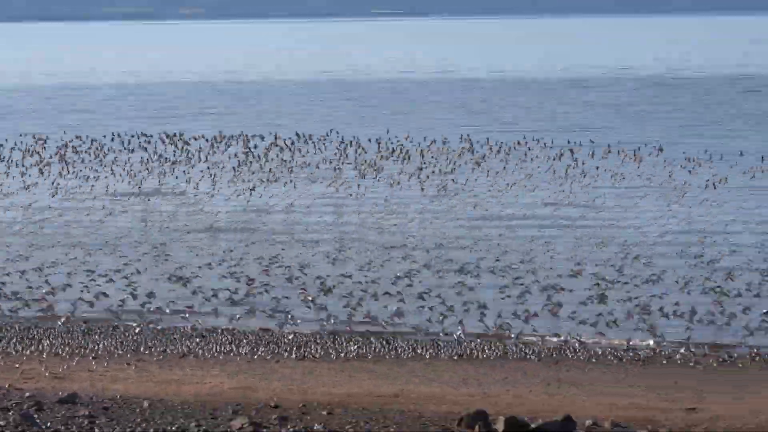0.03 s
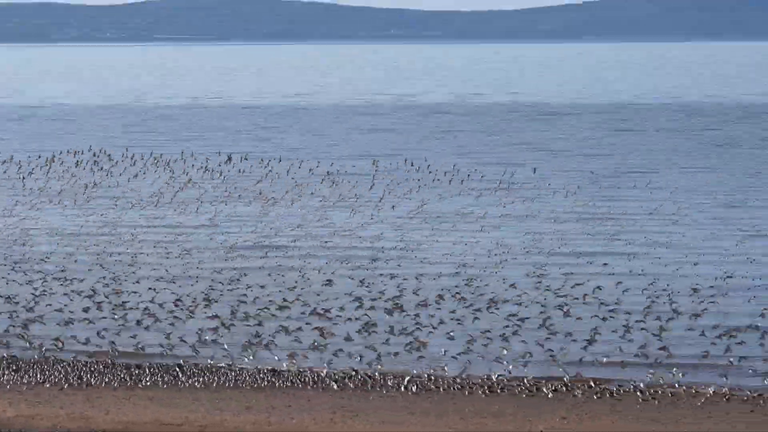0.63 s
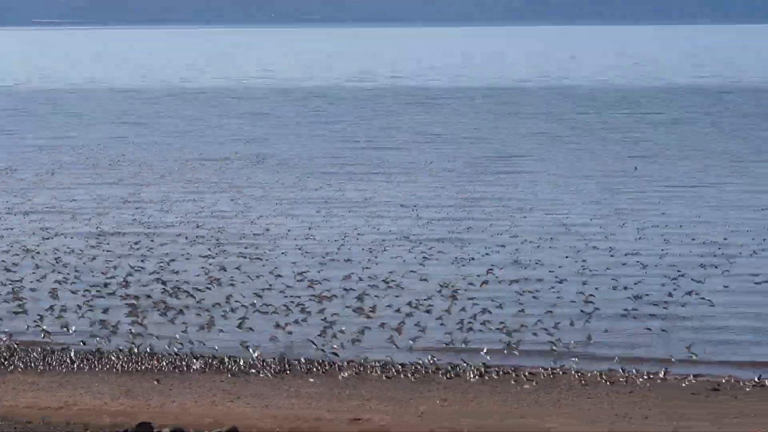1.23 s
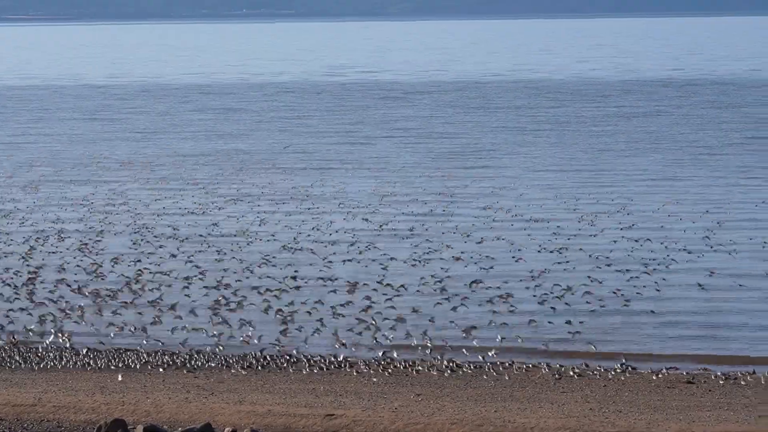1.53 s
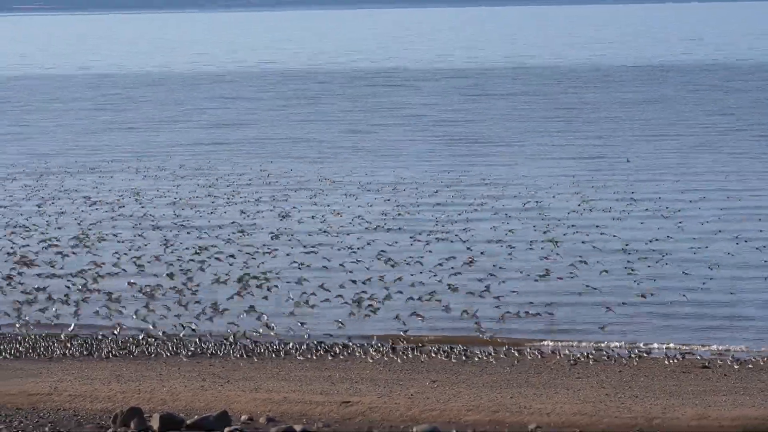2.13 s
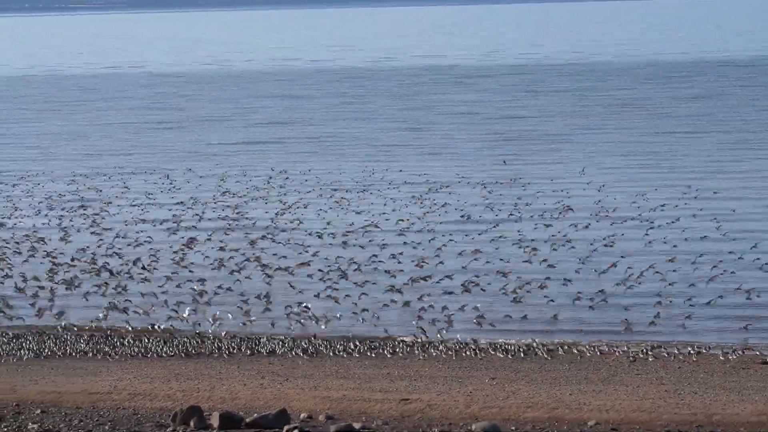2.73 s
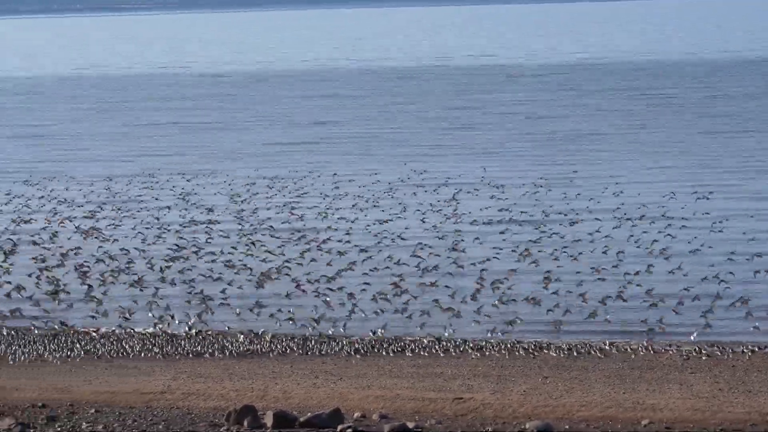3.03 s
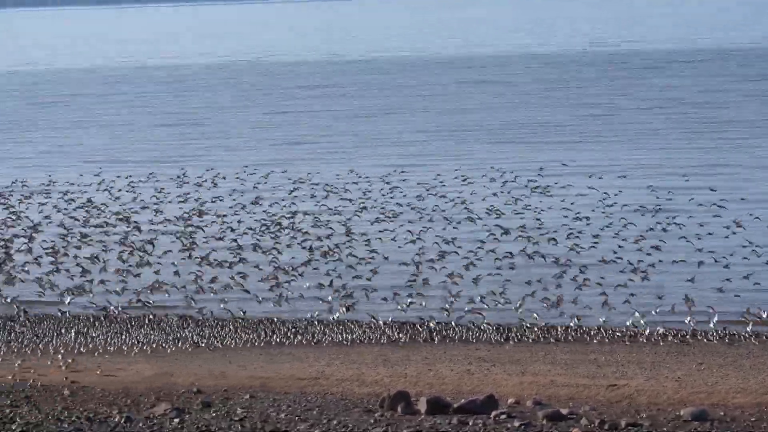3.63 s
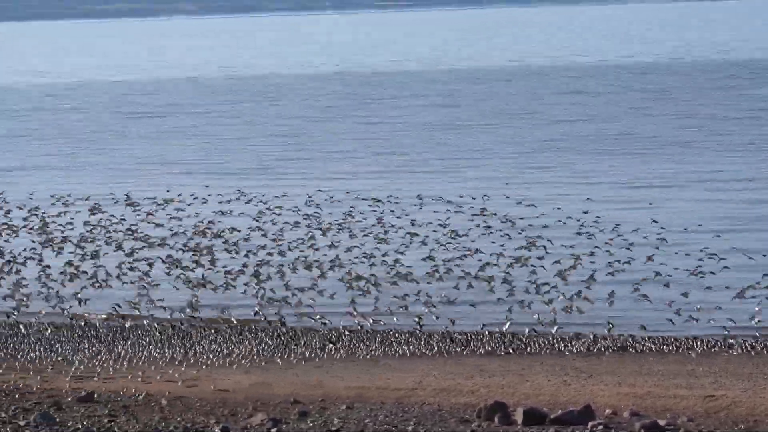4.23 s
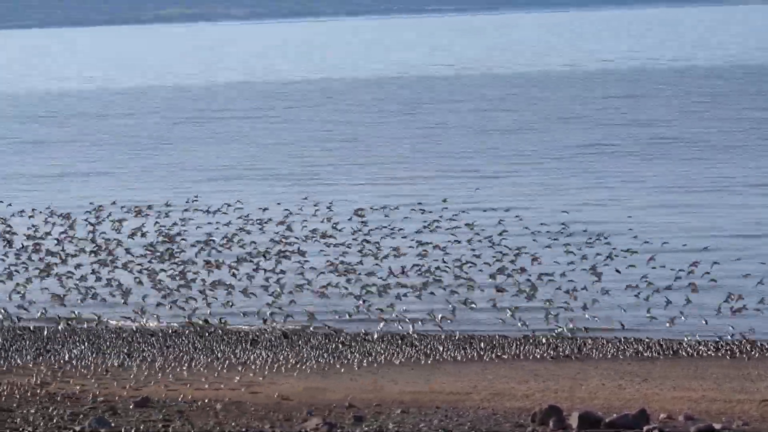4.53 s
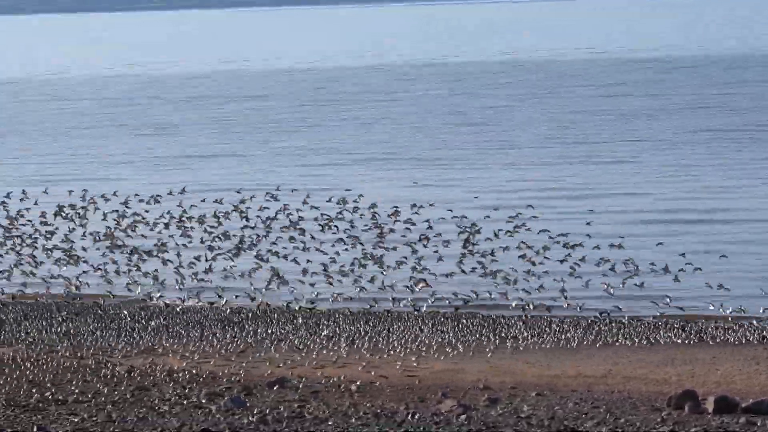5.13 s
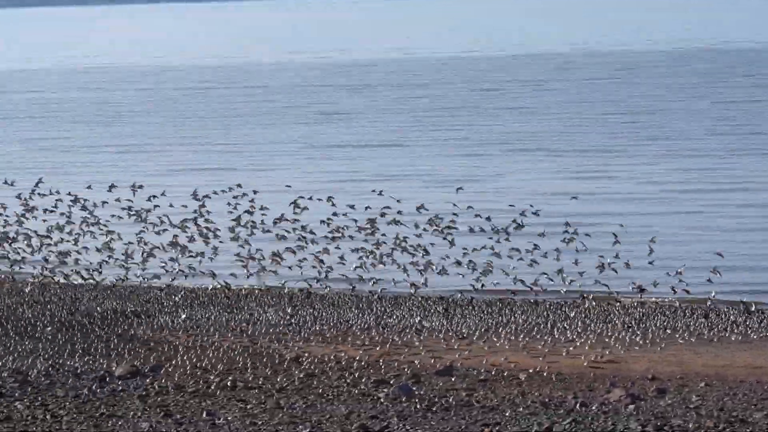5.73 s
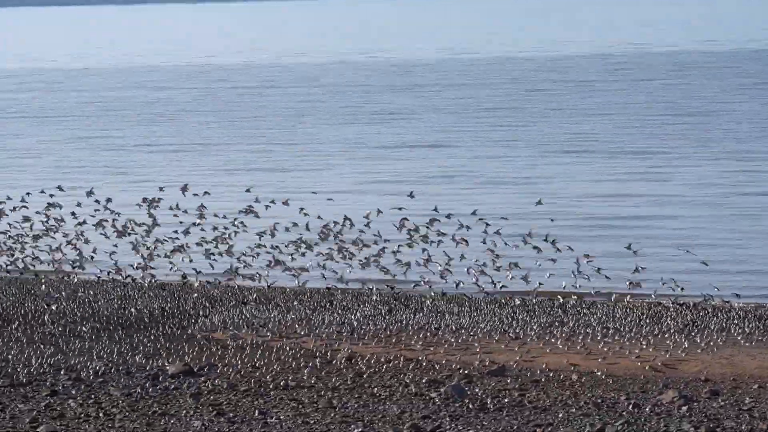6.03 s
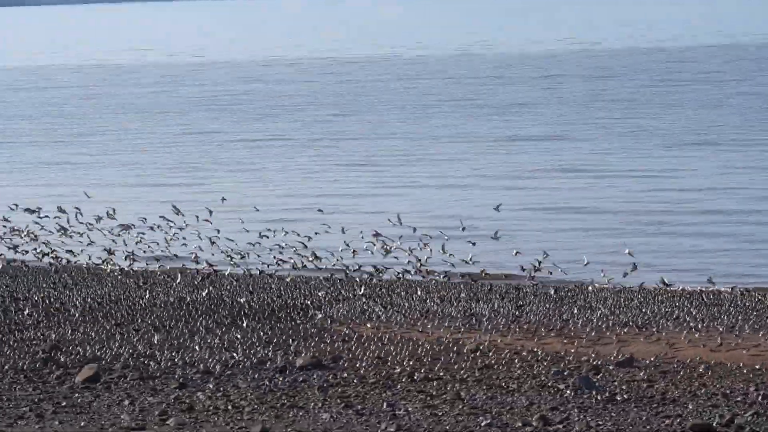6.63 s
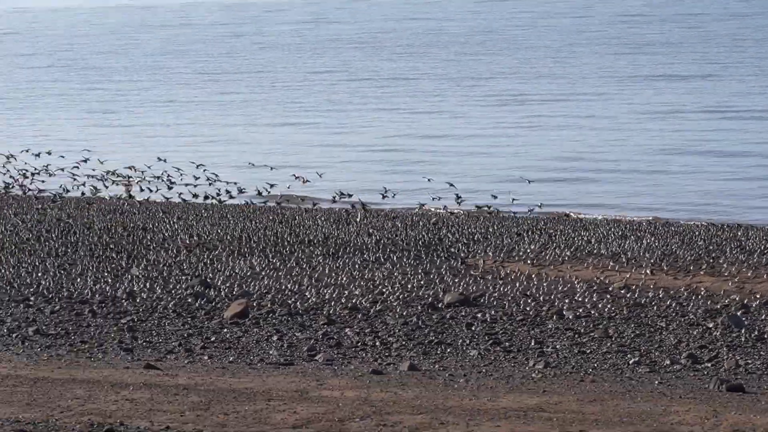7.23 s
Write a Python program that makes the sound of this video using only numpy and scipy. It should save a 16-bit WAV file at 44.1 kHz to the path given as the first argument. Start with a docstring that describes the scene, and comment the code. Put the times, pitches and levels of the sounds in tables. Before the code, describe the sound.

For about seven seconds, a large flock of small shorebirds makes a steady, wide hiss of blended twittering and rustling wings, with a faint wash of sea beneath. Close and louder, wind rumbles and thumps unevenly on the microphone throughout. A sharp, dry tick sounds nearby at 1.6 seconds. Small waves gurgle and foam softly around 2.7 and 5 seconds. Nearer birds add tiny high peeps, mostly between 2.5 and 5.7 seconds. At about 3.9 seconds one bird gives a clear, pure whistle that dips and then climbs. A faint, shorter whistle follows at 5.8 seconds, and another clear rising one at 6.2. The wind strikes hardest from 6 to 6.3 seconds and stays gusty to the end, while the flock eases slightly. A short, duller tap sounds close by at about 7.1 seconds.

```python
"""A hiss of thousands of sandpipers streams along a shore while wind buffets the microphone.
The hiss is their calls and wingbeats blending together. Small waves wash up the beach in bubbles
and foam, nearer birds peep, and something hard ticks close by. Later a few rising whistles,
like a plover's, stand out: each is one pure tone sliding in pitch."""
import sys
import numpy as np
from scipy import signal
from scipy.fft import rfft, irfft, next_fast_len
from scipy.io import wavfile
from scipy.ndimage import uniform_filter1d, map_coordinates

SR = 44100
rng = np.random.default_rng(int(sys.argv[2]) if len(sys.argv) > 2 else 0)


def store_pcm(level_fs):
    """Save levels as 16-bit WAV."""
    pcm = np.round(np.clip(level_fs, -1, 1) * 32767).astype(np.int16)
    wavfile.write(sys.argv[1], SR, np.atleast_2d(pcm).T)


N = 320607

# how loud the flock is: time_s, voices_db, wings_db
FLOCK_LEVELS = [(0, -46, -50), (1, -47, -48), (1.6, -45, -47.5), (3.1, -45.5, -47.3), (3.8, -43.5, -46.6),
                (4.65, -44.5, -46.5), (5.05, -44.5, -44.5), (5.8, -46, -44.5), (7.27, -49.5, -49)]
# tone of the massed voices and of the wings: frequency_hz, level_db
VOICES_TONE = [(1100, -52), (1900, -18), (2150, -5.5), (2500, 1.5), (2750, -2.9), (3000, 2.5), (3600, 1.1),
               (3900, -4), (4400, -8), (4650, -10), (4900, -16), (5700, -16.5), (9000, -34), (12000, -54)]
WINGS_TONE = [(200, -0.5), (400, -8.5), (750, -5.5), (1100, -1.5), (1250, -2.5), (1450, 2), (1700, 1.5),
              (1950, 0), (2250, 2), (2700, 3.5), (4000, -13.5), (7000, -25.5), (10000, -37)]
# strength of the breeze: time_s, level_db
BREEZE_LEVELS = [(0, -43), (.33, -35.5), (.7, -46), (1.1, -37.5), (1.6, -39.5), (1.8, -32.5), (2.15, -38.5),
                 (2.55, -37), (2.92, -41.5), (3.25, -36), (4.15, -42), (4.45, -52.5), (4.8, -41.5),
                 (5.33, -47.5), (5.56, -37.5), (5.85, -45.5), (6.1, -37), (7.27, -35)]
# sudden gusts: middle_s, half_length_s, level_db
GUSTS = [(.22, 0.0085, -29.5), (0.434, 0.014, -32), (0.807, 0.022, -33.5), (1.005, .03, -33.5),
         (1.555, 0.013, -33), (1.86, 0.033, -31.5), (2.42, 0.023, -29), (3.178, 0.023, -32),
         (3.382, 0.022, -30.5), (3.484, 0.0093, -29), (3.635, .015, -32.5), (3.74, 0.012, -30),
         (3.97, 0.0083, -32.5), (4.241, 0.011, -32), (4.6, 0.025, -36), (4.7, 0.028, -30),
         (5.683, 0.014, -34.5), (6.106, 0.039, -20.5), (6.263, 0.033, -24.5), (6.546, 0.023, -28),
         (6.743, 0.017, -27), (6.964, 0.045, -28.5), (7.217, 0.014, -25)]
# tone of the wind's rumble and of its flutter: frequency_hz, level_db
RUMBLE_TONE = [(12, -42), (20, -16), (49, 2), (81, 1), (122, -6.5), (177, -20.5), (330, -31), (430, -55),
               (730, -120)]
FLUTTER_TONE = [(60, -11), (110, 6), (160, -5.5), (230, -9), (330, -25.5), (500, -25.5), (900, -37),
                (2000, -80)]
# swirls of air that thump the microphone: middle_s, pitch_hz, level_db
WIND_THUMPS = [(0.122, 73, -21), (.277, 91, -20.5), (1.026, 69.5, -26), (1.438, 97, -15.5),
               (1.885, 90, -21), (2.404, 93, -16.5), (2.805, 102, -22), (3.278, 89.5, -21.5),
               (3.382, 92, -19.5), (6.049, 104, -14.5), (6.132, 152, -13.5), (6.218, 107, -15),
               (7.177, 204, -24.5), (7.208, 98, -15.5), (7.216, 128, -17.5)]
# tone of open water and of the microphone's own hiss: frequency_hz, level_db
SEA_TONE = [(100, -1), (300, 2), (550, 0.5), (1000, -1.5), (1500, -16.5), (3000, -24.5)]
HISS_TONE = [(300, -8), (3000, 8), (8000, 1.5), (11000, -2.5), (15500, -8.5)]
# small waves: crest_s, rise_s, fall_s, gurgle_db, foam_db
SMALL_WAVES = [(.47, .05, 0.38, -68, -65), (2.72, 0.37, 0.76, -52, -65.5), (4.95, 0.16, 0.66, -53.5, -60)]
# tone of their gurgle and of their foam: frequency_hz, level_db
GURGLE_TONE = [(200, -22), (350, 4), (600, 3.5), (1000, 3.5), (1600, -1), (3000, -31)]
FOAM_TONE = [(1000, 5), (3000, 3), (7000, 1), (10000, -1.5), (15000, -21)]
# the biggest bubbles: middle_s, pitch_hz, level_db
BIG_BUBBLES = [(2.71, 512, -48.5), (2.797, 634, -46), (3.13, 618, -50), (3.44, 566, -51),
               (4.842, 728, -48.5), (5.012, 353, -48), (5.235, 574, -48)]
# nearer sandpipers: middle_s, pitch_hz, level_db, slide_octaves_per_s
NEAR_PEEPS = [(.945, 5440, -56, -12), (1.472, 6000, -57, -27), (2.35, 7000, -59, -8),
              (2.575, 3360, -43, -10), (2.74, 6100, -54, -41), (3.559, 5950, -57, 25),
              (3.604, 5900, -56, -18), (3.688, 5750, -57, 18), (3.75, 5750, -57, 13),
              (3.867, 5700, -54, -16), (4.093, 5900, -54, 35), (4.17, 6200, -57, 34),
              (4.436, 5750, -53, -31), (5.008, 5900, -50, -42), (5.56, 5370, -55, -15),
              (5.71, 4020, -43, 0)]
# sharp ticks: start_s, level_db
SHARP_TICKS = [(1.587, -44), (1.591, -28.5)]
# the notes ringing in a tick: pitch_hz, level_db, fade_s (time to drop 60 dB)
TICK_NOTES = [(4630, 0.5, 0.021), (5350, 7, 0.0079), (6970, 2, 0.0086), (8500, -9, 0.011),
              (11140, -2, .006), (12530, 3, 0.0073), (14350, -4, 0.0088)]
# a duller tap: start_s, pitch_hz, level_db
DULL_TAPS = [(7.0808, 1620, -26.5)]
# whistles: start_s, dip_s, climb_s, opening_hz, low_hz, crest_hz, bow (0 = straight), level_db, dip_db
WHISTLE_CALLS = [ (3.212, .006, .03, 4300, 4300, 5230, .15, -60, 0),
                 (3.863, .08, .17, 3470, 2490, 3620, .16, -44, -9),
                 (5.8, .035, .09, 2400, 2270, 2700, 0, -54, 0),
                 (6.211, .05, .156, 3270, 2510, 3610, 0, -44.7, 4)]
# how alike left and right sound: frequency_hz, likeness (0 to 1)
STEREO_LIKENESS = [(50, 1), (110, 0.78), (200, 1), (340, 0.6), (600, 0.65), (1100, 0.53), (1270, 0.45),
                   (1500, 0.68), (2500, 0.8), (3200, .2), (3700, 0.91), (4500, 0.24), (5200, 0.31),
                   (15000, 0.24)]
# the same for flutter, whose small swirls hit each side separately: frequency_hz, likeness
FLUTTER_LIKENESS = [(80, .6), (160, 0.48), (260, 0.054)]
# the microphone's two openings hear the shore differently: frequency_hz, left_minus_right_db
LEFT_LOUDER = [(1100, 0), (1280, 4), (1600, -1.5), (1950, -1.5), (2250, -1), (2650, -1.5), (3050, 3),
               (3550, 6), (4400, 3.5), (5800, 3), (7500, -0.5), (15000, -1)]
# how far the left opening runs ahead of the right: frequency_hz, phase_radians
LEFT_AHEAD = [(90, 0.076), (230, 1.1), (380, -0.051), (520, 0.89), (1200, -0.12), (2500, 0.89),
              (2950, 1.78), (3350, 0.96), (4300, 0.3), (4650, 0.47), (5400, 1), (9000, 1.2), (15000, .3)]

TIME_S = np.arange(N) / SR


def amp(db):
    """Turn decibels into a number to multiply by."""
    return 10 ** (np.asarray(db) / 20)


def unit_level(sound):
    """Scale a sound to an average power of 1."""
    return sound / np.sqrt(np.mean(sound ** 2) + 1e-20)


def value_at(table, hz):
    """Read between a table's rows, on a scale of octaves."""
    row_hz, values = np.transpose(table)
    return np.interp(np.log(hz + 1), np.log(row_hz + 1), values)


def over_time(table):
    """Turn each column after the time into one value per sample."""
    times, *columns = np.transpose(table)
    return [np.interp(TIME_S, times, column) for column in columns]


def wobble(per_s):
    """A smooth curve through per_s random values a second."""
    return map_coordinates(rng.standard_normal(int(N * per_s / SR) + 4), [TIME_S * per_s])


def filtered(sound, gain_at):
    """Multiply each frequency in a sound by gain_at(hz)."""
    size = next_fast_len(N + 8192)
    return irfft(rfft(sound, size) * gain_at(np.fft.rfftfreq(size, 1 / SR)), size)[..., :N]


def noise():
    """Two unrelated white noises."""
    return rng.standard_normal((2, N))


def spread(pair, tone, likeness=STEREO_LIKENESS):
    """Give two unrelated sounds a tone and blend them into wide stereo, at a power of 1."""
    def gain_at(hz):
        angle = np.arccos(np.clip(value_at(likeness, hz), 0, 1)) / 2
        return amp(value_at(tone, hz)) * [np.cos(angle), np.sin(angle)]
    middle, side = filtered(pair, gain_at)
    return unit_level(np.array([middle + side, middle - side]))


def sine(hz):
    """A pure tone that follows a changing pitch."""
    return np.sin(2 * np.pi * np.cumsum(hz, axis=-1) / SR)


def swarm(count, low_hz, high_hz, length_s, glide, arch, scatter_db):
    """Two unrelated crowds of short sliding notes with random times, pitches and levels."""
    when, pitch, length, bend, size, side = rng.random((count, 6)).T[:, :, None]
    t = np.arange(2048) / SR
    progress = np.minimum(t / np.minimum(length_s * (.5 + length), t[-1]), 1)
    slide = 1 + glide * bend * (progress - .5) - arch * (2 * progress - 1) ** 2
    hz = (low_hz + (high_hz - low_hz) * pitch) * slide
    notes = amp(-scatter_db * np.log(1 - .99 * size)) * progress * (1 - progress) * sine(hz)
    slots = ((when * N).astype(int) + np.arange(len(t))) % N + N * (side > .5)
    return unit_level(np.bincount(slots.ravel(), notes.ravel(), 2 * N).reshape(2, N))


def chirp(middle_s, hz, db, octaves_per_s, width_s):
    """A short note that swells and fades as it slides through the pitch hz."""
    t = np.arange(-1024, 1024) / SR
    pitch = hz * 2 ** np.clip(octaves_per_s * t, -1, 1)
    start = max(round(middle_s * SR) - len(t) // 2, 0)
    out = np.zeros(N)
    out[start:][:len(t)] = np.exp(-(t / width_s) ** 2) * sine(pitch)
    return amp(db) * np.sqrt(2) * out


def flock():
    """Far calls melt into a hiss, nearer ones twitter, and wings rustle underneath."""
    voices_db, wings_db = over_time(FLOCK_LEVELS)
    twitter = swarm(3600, low_hz=2402, high_hz=4696, length_s=.0203,
                    glide=-.1, arch=.046, scatter_db=-1.7)
    thin = swarm(1100, low_hz=5360, high_hz=8570, length_s=.012, glide=-.342, arch=.062, scatter_db=3)
    voices = spread(noise() + amp(-12) * twitter + amp(-11.5) * thin, VOICES_TONE)
    wings = spread(noise() * amp(.69 * np.array([wobble(35), wobble(38)])), WINGS_TONE)
    return amp(voices_db) * voices + amp(wings_db) * wings


def wind():
    """Churning air rumbles and thumps on the microphone; harder gusts bring out a higher flutter."""
    breeze_db, = over_time(BREEZE_LEVELS)
    power = amp(breeze_db + 3 * wobble(per_s=30)) ** 2
    for middle_s, half_s, db in GUSTS:
        power += (amp(db) * np.exp(-((TIME_S - middle_s) / half_s) ** 2 / 2)) ** 2
    strength = np.sqrt(power)
    rumble = spread(noise(), RUMBLE_TONE)
    # even out the noise's own swells, so the wind sets how loud it is
    rumble /= np.sqrt(abs(uniform_filter1d(np.mean(rumble ** 2, 0), size=3000)) + 1e-6)
    flutter_gain = amp(-38) * (strength / amp(-28.5)) ** 1.38  # grows faster than the rumble
    flutter = spread(noise(), FLUTTER_TONE, FLUTTER_LIKENESS) * amp(1.9 * wobble(45))
    out = strength * amp(1.8 * wobble(40)) * rumble + flutter_gain * flutter
    t = np.arange(-1024, 1024) / SR
    for middle_s, hz, db in WIND_THUMPS:
        phase = 2 * np.pi * hz * t
        thump = phase * np.exp(-phase ** 2 / 2)  # a passing swirl sucks, then pushes
        out[:, round(middle_s * SR) - len(t) // 2:][:, :len(t)] += amp(db) * thump
    return out


def open_water():
    """The sea's steady, low wash."""
    return amp(-56) * spread(noise(), SEA_TONE)


def microphone_hiss():
    """The microphone's own faint, steady noise."""
    return amp(-64) * spread(noise(), HISS_TONE)


def small_waves():
    """Small waves tip over in a gurgle of bubbles and drain away in foam."""
    gurgle_gain = foam_gain = 0
    for crest_s, rise_s, fall_s, gurgle_db, foam_db in SMALL_WAVES:
        t = TIME_S - crest_s
        swell = np.where(t < 0, np.exp(-(t / rise_s) ** 2), np.exp(-abs(t) / fall_s))
        gurgle_gain += amp(gurgle_db) * swell
        foam_gain += amp(foam_db) * swell
    bubbles = swarm(1200, low_hz=286, high_hz=1125, length_s=.016, glide=.22, arch=0, scatter_db=.5)
    spray = noise() * amp(2.2 * wobble(200))
    plops = sum(chirp(s, hz, db, octaves_per_s=12, width_s=.009) for s, hz, db in BIG_BUBBLES)
    gurgle = spread(bubbles + amp(14.5) * noise(), GURGLE_TONE)
    return gurgle_gain * gurgle + foam_gain * spread(spray, FOAM_TONE) + plops


def peeps():
    """Nearer sandpipers give tiny notes, most flicking up or down in pitch."""
    notes = sum(chirp(s, hz, db, slide, width_s=.005) for s, hz, db, slide in NEAR_PEEPS)
    return notes * amp(2 * wobble(500) - 1)


def ticks():
    """Hard things touch close by: a dry crack with a very short ring, and later a duller tap."""
    out = np.zeros(N)
    t = np.arange(2048) / SR
    onset = 1 - np.exp(-t / .00049)
    for start_s, db in SHARP_TICKS:
        ring = sum(amp(note_db - 60 * t / fade_s) * np.sin(2 * np.pi * (hz * t + rng.random()))
                   for hz, note_db, fade_s in TICK_NOTES)
        crack = 1.2 * amp(-60 * t / .0058) * rng.standard_normal(len(t))
        tick = onset * (ring + crack)
        out[round(start_s * SR):][:len(t)] += amp(db) * tick / abs(tick).max()
    for start_s, hz, db in DULL_TAPS:
        tap = amp(db - 60 * t / .011) * onset * np.sin(2 * np.pi * hz * t)
        out[round(start_s * SR):][:len(t)] += tap
    return out * amp([[1.7], [-1.7]])  # a little to the left


def whistles():
    """A bird's pure, slightly shaky tone: it usually dips first, then climbs and sags past the top."""
    flick_s, sag_hz, sag_s = .023, 150, .017
    fade_in_s, fade_out_s, accent_db = .006, .029, 2.5
    lead_in = SR // 50
    t = np.arange(-lead_in, SR // 2) / SR
    out = np.zeros(N)
    for start_s, dip_s, climb_s, opening_hz, low_hz, crest_hz, bow, db, dip_db in WHISTLE_CALLS:
        flick = np.exp(-(np.maximum(t, 0) / flick_s) ** 2)
        progress = np.clip((t - dip_s) / climb_s, 0, 1)
        rise = progress + bow * np.sin(np.pi * progress)
        past_crest_s = np.maximum(t - dip_s - climb_s, 0)
        sag = np.minimum(past_crest_s / sag_s, 2) ** 3
        hz = low_hz + (opening_hz - low_hz) * flick + (crest_hz - low_hz) * rise - sag_hz * sag
        fade = np.exp(-(np.minimum(t, 0) / fade_in_s) ** 2 - (past_crest_s / fade_out_s) ** 4)
        in_dip = (1 - flick) * (1 - rise) ** 4
        at_ends = flick + progress ** 8
        gain = amp(db + accent_db * at_ends + dip_db * in_dip)
        out[round(start_s * SR) - lead_in:][:len(t)] += gain * fade * np.sqrt(2) * sine(hz)
    return out * amp(1.6 * wobble(90))


def beach_echo(sound, echo_db=-10, fade_s=.25):
    """Sound scatters off the beach and gains a short, faint tail, different in each ear."""
    t = np.arange(SR // 4) / SR
    tail = rng.standard_normal((2, len(t))) * amp(-60 * t / fade_s)
    tail /= np.linalg.norm(tail[0])
    return sound + amp(echo_db) * signal.fftconvolve(sound[None], tail, axes=1)[:, :N]


def scene():
    """Birds and water ahead, wind and ticks up close; left and right differ in level and timing."""
    sides = [.5, -.5]  # left and right each take half, in opposite directions
    shore = flock() + beach_echo(whistles()) + peeps() + small_waves() + open_water()
    shore = filtered(shore, lambda hz: amp(np.outer(sides, value_at(LEFT_LOUDER, hz))))
    air = filtered(shore + wind(), lambda hz: np.exp(1j * np.outer(sides, value_at(LEFT_AHEAD, hz))))
    return air + ticks() + microphone_hiss()


def record(dry):
    """Cut away the very highest treble."""
    return filtered(dry, lambda hz: hz < 15780)


dry = scene()
out = record(dry)
store_pcm(out)
```